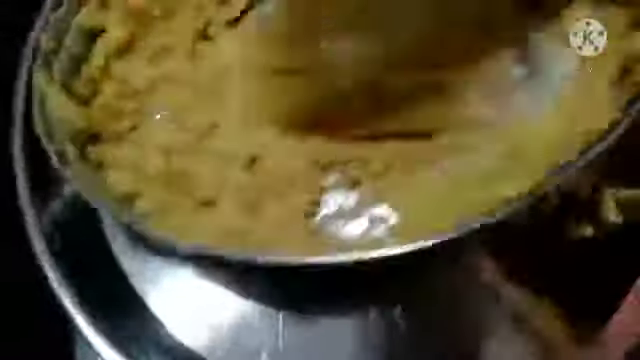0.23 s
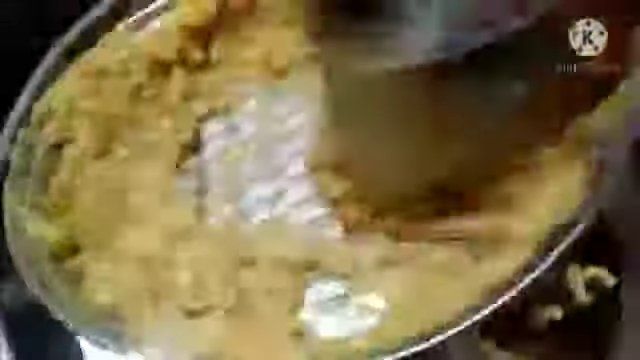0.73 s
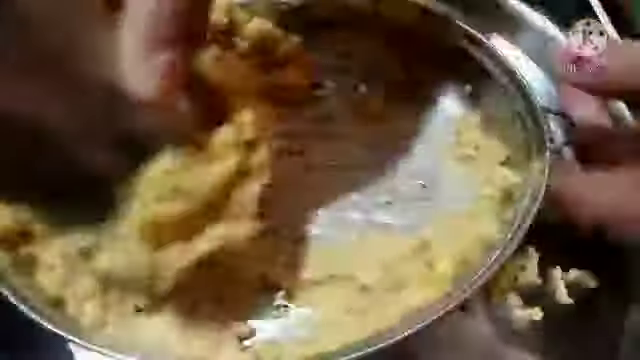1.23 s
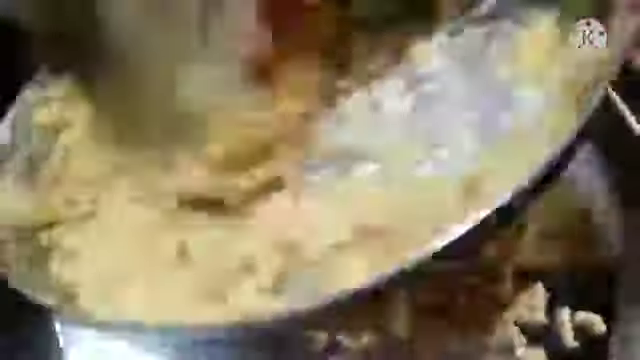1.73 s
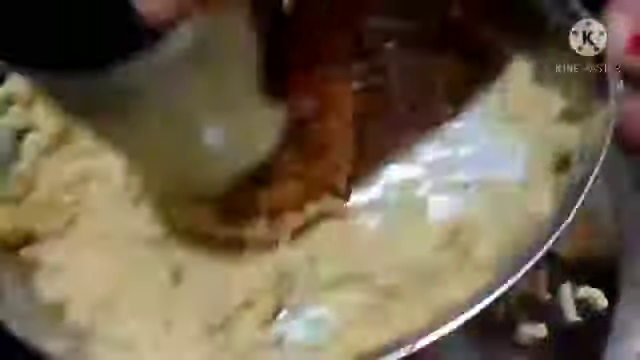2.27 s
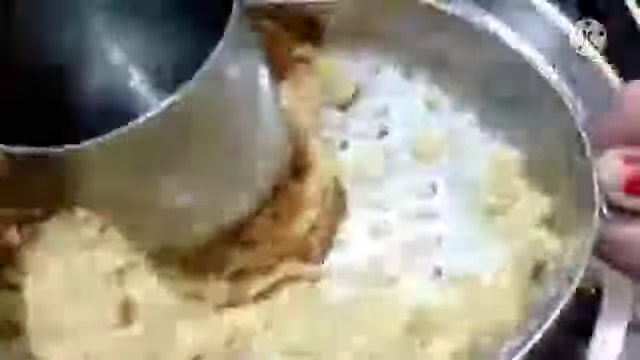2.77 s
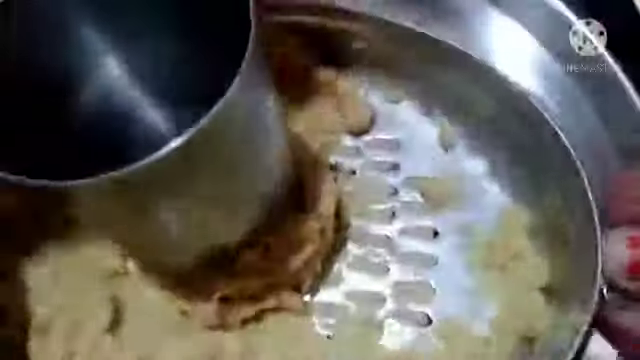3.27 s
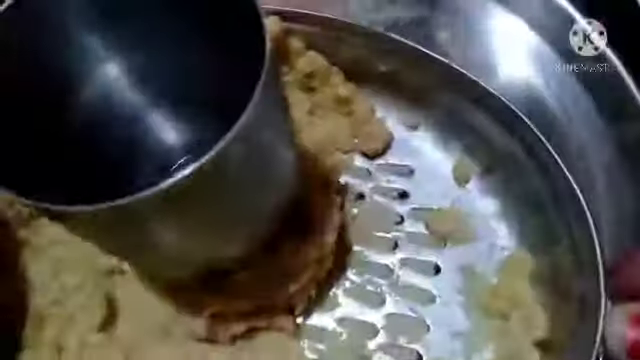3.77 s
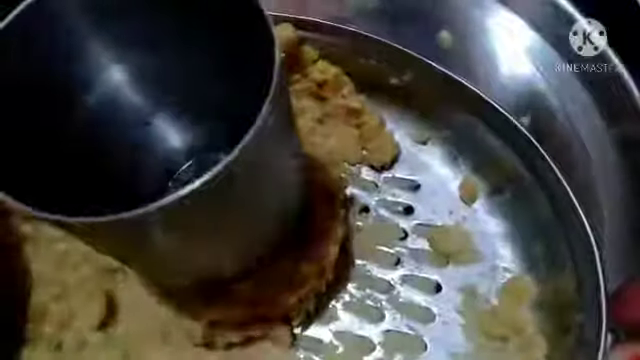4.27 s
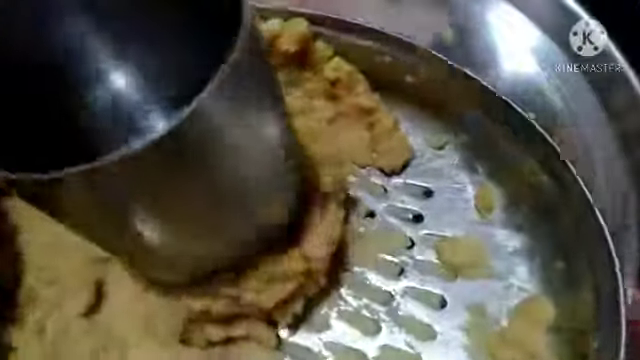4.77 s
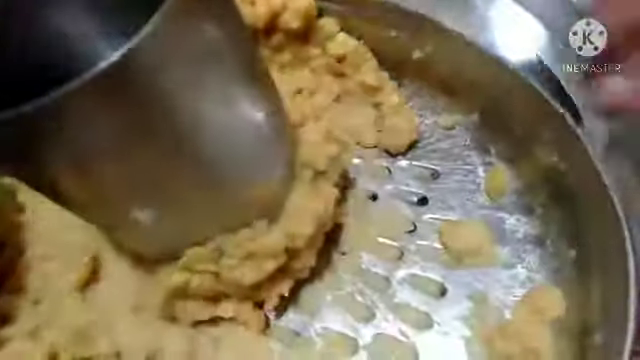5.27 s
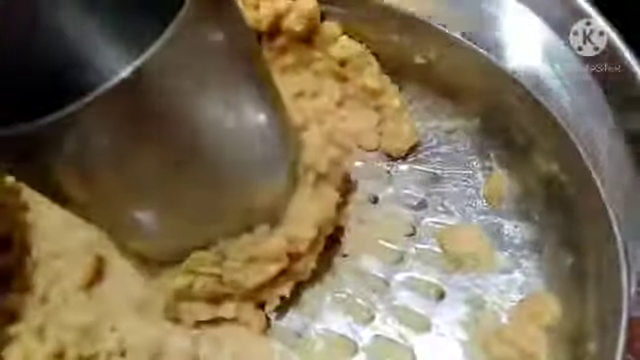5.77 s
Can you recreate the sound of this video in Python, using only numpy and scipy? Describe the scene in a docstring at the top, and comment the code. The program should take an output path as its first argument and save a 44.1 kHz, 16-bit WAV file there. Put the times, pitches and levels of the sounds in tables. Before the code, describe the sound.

Gritty rubbing and soft wet pops on perforated steel, scattered clanks, a hard cluster of steel knocks, then near quiet over faint hum.

```python
"""Rubbing lentils through a steel sieve

Cooked lentils are rubbed through a perforated steel sieve with the base of a steel tumbler in a small hard kitchen.
Under each stroke dense clicks hiss, and wet pops squelch through a resonance that glides in pitch.
Steel knocks are short noise cracks that set damped modes ringing into a noise-tail room; low smacks and dry ticks
are brief pitched bursts. Low thumps swing back slowly under the heaviest knocks, and the room tone and motor hum
behind, coloured noise and wavering sines, dip for a moment after each."""
import sys
import numpy as np
from scipy import signal
from scipy.fft import rfft, irfft
from scipy.io import wavfile

SR = 44100
rng = np.random.default_rng(int(sys.argv[2]) if len(sys.argv) > 2 else 0)


def unload_audio(sound):
    """Save the sound as a 16-bit wav file, at the path given as the first command line argument."""
    columns = np.transpose(np.atleast_2d(sound))
    # keep every value between -1 and 1, then stretch to whole-number steps
    steps = np.round(np.clip(columns, -1, 1) * 32767)
    wavfile.write(sys.argv[1], SR, steps.astype(np.int16))


def invert_db(x):
    """Field ratio 10**(x/20) for x, a level in decibels (scalar or array-like)."""
    u = np.asarray(x, float) / 20
    return 10 ** u


N = 265041  # samples

# strokes of the tumbler: (hardest moment [s], lead-in [s], friction hiss [dB], squelch [dB],
# way [1 push, -1 pull, less for a short slide])
RUB_STROKES = [(0.019, 0.067, -46, -52.5, -0.7), (0.159, 0.056, -46.5, -50.5, -1.15),
               (0.286, 0.059, -46.5, -50.5, -0.95), (0.435, 0.069, -47.5, -50.5, 0.71),
               (0.576, 0.071, -41, -46, -1.1), (0.737, 0.077, -41, -45.5, 0.4),
               (0.828, 0.022, -41, -47, -1.16), (1.42, 0.23, -58, -62.5, -0.36),
               (1.57, 0.095, -48.5, -51, 0.18), (1.806, 0.19, -58, -62.5, -1.03),
               (1.862, 0.07, -50, -48.5, 0.81), (2.013, 0.13, -52, -63, -0.33),
               (2.098, .035, -50, -45, 0.58), (2.209, 0.05, -52.5, -63, -0.79),
               (2.27, 0.021, -62.5, -72, 0.13), (2.381, 0.071, -59, -62.5, 1),
               (5.385, 0.14, -48, -61.5, 0.1), (5.451, 0.06, -43, -59, 0.33), (5.529, .02, -50.5, -69, -2),
               (5.984, 0.07, -57.5, -72, 0.68)]
# knocks that set the steel ringing: (time [s], crack peak [dB], favoured ring [Hz],
# brightness control [dB before scaling], ringing drive [dB re crack])
STEEL_KNOCKS = [(.461, -28.5, 4540, 8, -8.8), (.872, -11.5, 6500, 28, -7.5), (.883, -17.5, 5760, -20, -28),
                (1.513, -38, 4520, 20, -6), (1.578, -18.5, 3260, -8, -10.5), (1.642, -24, 2280, -2, -6.5),
                (2.023, -17, 2400, 22, -6.5), (2.298, -18, 3170, 15, -12), (3.013, -28.5, 6500, 19, -1),
                (3.018, -32, 3840, 25, -9.5), (3.077, -39, 3650, 8, -10), (3.292, -27.5, 2700, -52, -8),
                (3.308, -30, 5360, -37, -1), (3.781, -9, 5900, -4.5, 0.5), (3.941, -10.5, 6040, 16.5, -2.5),
                (4.097, -7.5, 5800, 12, -4), (4.114, -17, 6300, -2.5, 5.5), (4.146, -19, 6150, 1, -4),
                (4.265, -15.5, 7440, 9, 3), (4.421, -9.5, 6230, 12, -0.5), (4.821, -52, 3190, 3, -7),
                (5.458, -35, 3210, 42, -3.5), (5.545, -36, 3570, 16, -14.5), (6.004, -21.5, 6180, -21, -35)]
# low thumps: the recorder's high-pass makes the heaviest knocks swing back slowly:
# (time [s], height [factor on the swing], background dip [dB])
LOW_THUMPS = [(.873, .07, -8), (3.782, .07, -4), (3.942, .003, -6), (4.098, -.012, -6), (4.421, .052, -6)]
# modes of sieve, tumbler and pot below: (frequency [Hz], relative strength [dB], t60 [s])
STEEL_MODES = [(270, -10, .2), (330, -14, .2), (470, -10, .08), (985, -9, .18), (1140, -14, .1),
               (2090, 3, .08), (2509, 3, .055), (2960, -8, .12), (3391, -9, .1), (3480, -3, .11),
               (3690, -7, .12), (3811, -3, .16), (3980, -4, .14), (4180, -4, .14), (4893, -7, .12),
               (5390, -8, .12), (5570, -7, .12), (5981, -8, .1), (6320, -7, .12), (6500, -6, .15),
               (6850, -7, .12), (7084, -6, .12), (7644, -10, .12), (8904, -12, .1), (10350, -12, .1),
               (11750, -12, .1), (13100, -10, .1)]
# friction spectrum: (frequency [Hz], relative level [dB per Hz])
HISS_SPECTRUM = [(1180, -41), (2000, -31), (2160, -15), (2550, -25), (2780, -12), (4750, -6), (6210, 2.5),
                 (11100, -8.5), (12200, -7), (13200, -5.5), (15800, 1)]
# crack spectrum of a knock, before its own tilt and focus: (frequency [Hz], relative level [dB per Hz])
CRACK_SPECTRUM = [(53, -22.5), (90, -7.5), (337, -10.5), (466, -3.5), (672, 1.5), (930, 7.5), (1740, -8.5),
                  (3120, -6.5), (3790, -15.5), (6240, -2), (8440, -14), (12700, -12), (14800, -6.5),
                  (15800, -5.5)]
# decay of the kitchen: (frequency [Hz], t60 [s])
ROOM_DECAY = [(200, 0.93), (1400, 0.48), (3700, 0.6), (9700, 0.41), (15000, 0.37)]
# room tone spectrum: (frequency [Hz], relative level [dB per Hz])
ROOM_TONE = [(50, -31), (85, -6.5), (115, -10.5), (147, -21), (222, -9.5), (678, -23.5), (844, -20.5),
             (1810, -23.5), (2020, -25.5), (2570, -28), (4640, -32.5), (6450, -30), (12700, -37),
             (14800, -28), (15800, -42.5)]
# motor lines: (frequency [Hz], level [dB])
MOTOR_LINES = [(48.4, -59), (96.9, -66), (193.8, -77), (344.5, -79), (586.8, -84.5), (1297, -84),
               (1960, -93.5), (2056, -79.5)]
# dry ticks of grit on steel: (time [s], peak [dB], pitch [Hz])
GRIT_TICKS = [(.572, -26, 6350), (.857, -22, 6300), (1.339, -34, 6300), (1.372, -18, 6270),
              (1.421, -26, 6540), (1.478, -45.5, 3500), (1.546, -40, 5030), (1.822, -39, 6000),
              (2.203, -35.5, 6300), (2.252, -40, 6960), (2.396, -37.5, 6800), (2.428, -47, 6700),
              (3.642, -50, 8440), (4.877, -49.5, 6460), (5.065, -50.5, 6480), (5.259, -49.5, 6240),
              (5.38, -52, 6500), (5.505, -36.5, 6900), (5.545, -27.5, 7700), (5.688, -50.5, 6800)]
# low smacks, wet paste under the strokes and dull thuds under the knocks: (time [s], peak [dB], pitch [Hz])
LOW_SMACKS = [(.025, -43, 714), (.04, -35.5, 1450), (.138, -35, 1260), (.462, -32, 1420), (.558, -32, 1780),
              (.571, -27, 1200), (.745, -32, 1300), (.836, -29.5, 1260), (1.277, -45.5, 1060),
              (1.343, -48.5, 644), (1.372, -39.5, 1380), (1.589, -26.5, 1490), (1.979, -38, 575),
              (1.995, -32.5, 1480), (2.11, -35, 600), (2.128, -34.5, 810), (3.293, -31, 457),
              (3.773, -23, 550), (4.116, -29.5, 480), (4.267, -26, 459), (5.259, -47.5, 664),
              (5.37, -49, 1250), (5.49, -47.5, 1350), (5.55, -49, 1260)]

LET_GO_S, PRESSURE_POWER = 0.099, 2.4
RUMBLE_HZ, RUMBLE_DB = [55, 317], -11  # band; level re the unit squelch
# the air pocket under the paste shrinks on a push (pitch climbs) and widens on a pull
POCKET_HZ, POCKET_OCTAVES, GLIDE_S, PUSH_LATE_S, PULL_LATE_S = 982, 1, 0.018, 0.0086, 0.014
SMACK_OCTAVES, SMACK_S, SMACK_CYCLES = 0.31, 0.0013, 3.15  # width; fade = time + cycles of its pitch
TICK_OCTAVES, TICK_S, TICK_TOP_HZ, TICK_TOP_DB = 0.39, 0.0017, 13500, -11.5  # width, fade, upper ring
BODY_DB, TREBLE_DB = -27, -7.5  # low and high end of a neutral crack's tilt, before scaling
PITCHED_BELOW_HZ = 5000  # knocks favouring a lower ring are duller and more pitched
PITCHED_RING_DB, BRIGHT_RING_DB = -5.5, -17.5  # how hard each kind drives the modes
FOCUS_OCTAVES, NEAR_DB_PER_OCTAVE = 1, -45.5  # reach of the crack's peak; fall of modes away from the ring
PITCHED_FAR_DB, BRIGHT_FAR_DB = -21, -13  # floor of that fall
SMOOTH_SHARE = 0.45  # share of the smooth pulse in what a knock sends into the room
DIP_FALL_S, DIP_HOLD_S, DIP_RETURN_S = 0.04, 0.2, 0.28
ROOM_TONE_DB = -65.5


def rubbing():
    """Dense grit hisses; wet paste pops into the moving air pocket and the shallow dish of the sieve."""
    t, hiss_gain, squelch_gain = np.arange(N) / SR, np.zeros(N), np.zeros(N)
    for hardest, lead_s, hiss_db, squelch_db, way in RUB_STROKES:
        ramp = np.interp(t, [hardest - lead_s, hardest, hardest + LET_GO_S], [0, 1, 0])
        pressure = np.sin(np.pi / 2 * ramp) ** PRESSURE_POWER
        hiss_gain += invert_db(hiss_db) * pressure
        squelch_gain += invert_db(squelch_db) * pressure
    hiss = colour(grains(8000, spread_db=2.5), HISS_SPECTRUM) * invert_db(3.2 * drift(56))
    pops = grains(3000, spread_db=3.2) * invert_db(3.8 * drift(60))
    dish = rms_one(band_pass(pops, [1000, 2500]))
    gliding = rms_one(pocket(pops, pocket_pitch(t), sharpness=5.0))
    # the sieve shudders on the pot under each stroke
    rumble = rms_one(band_pass(pops, RUMBLE_HZ))
    squelch = rms_one(gliding + 0.9 * dish) + invert_db(RUMBLE_DB) * rumble
    return hiss * hiss_gain + squelch * squelch_gain


def pocket_pitch(t):
    """Pitch of the air pocket: the nearest stroke sweeps it up or down."""
    hardest, way = np.array(RUB_STROKES)[:, 0], np.array(RUB_STROKES)[:, 4]
    nearest = np.searchsorted((hardest[1:] + hardest[:-1]) / 2, t)
    late = np.where(way[nearest] > 0, PUSH_LATE_S, PULL_LATE_S)
    since = t - hardest[nearest] - late
    return POCKET_HZ * 2 ** (POCKET_OCTAVES * way[nearest] * np.tanh(since / GLIDE_S))


def pocket(x, hz, sharpness):
    """An air resonance whose centre moves, stepped in short blocks."""
    out, state, size = np.zeros(N), np.zeros(2), 128
    for i in range(0, N, size):
        r = np.exp(-np.pi * hz[i] / sharpness / SR)
        zeros = [np.sqrt(1 - r), 0, -np.sqrt(1 - r)]
        poles = [1, -2 * r * np.cos(2 * np.pi * hz[i] / SR), r * r]
        out[i:i + size], state = signal.lfilter(zeros, poles, x[i:i + size], zi=state)
    return out


def knocks():
    """A short crack drives the modes nearest its favoured ring; returns close sound and room send."""
    cracks, loose, size = np.zeros(N + SR), np.zeros(N + SR), 2000
    modes, hz = np.array(STEEL_MODES), np.arange(size // 2 + 1) * SR / size
    mode_hz, mode_db = modes[:, 0], modes[:, 1]
    excite = np.zeros((len(modes), N + SR))
    noise = rng.standard_normal((len(STEEL_KNOCKS), size))
    luck_db = rng.normal(0, 2, (len(STEEL_KNOCKS), len(modes)))
    for k, (s, peak_db, ring_hz, bright_db, ringing_db) in enumerate(STEEL_KNOCKS):
        i = round(s * SR)
        if ring_hz < PITCHED_BELOW_HZ:
            focus_db, drive_db, far_db = 10.5, PITCHED_RING_DB, PITCHED_FAR_DB
        else:
            focus_db, drive_db, far_db = 2.5, BRIGHT_RING_DB, BRIGHT_FAR_DB
        tilt = [(1200, BODY_DB - bright_db / 2), (2200, 0.0053), (7500, 0), (10000, TREBLE_DB + bright_db / 2)]
        reach = 2 ** FOCUS_OCTAVES
        focus = [(ring_hz / reach, 0), (ring_hz, focus_db), (ring_hz * reach, 0)]
        tone_db = at_hz(CRACK_SPECTRUM, hz) + 0.32 * at_hz(tilt, hz) + at_hz(focus, hz)
        crack = burst(noise[k], tone_db, 0.00047, 0.0042)
        # same colour as the crack, in one smooth pulse
        pulse = np.roll(irfft(invert_db(tone_db), size), size // 20)
        blow = rms_one(pulse) * np.std(crack)
        cracks[i:i + size] += invert_db(peak_db) * crack
        mixed = SMOOTH_SHARE * blow + (1 - SMOOTH_SHARE) * crack
        loose[i:i + size] += invert_db(peak_db + ringing_db) * mixed
        away_db = np.maximum(NEAR_DB_PER_OCTAVE * np.abs(np.log2(mode_hz / ring_hz)), far_db)
        near_db = away_db * (mode_hz > 1500) + 0.5 * at_hz(tilt, mode_hz)
        excite[:, i] += invert_db(peak_db + ringing_db + drive_db + mode_db + near_db + luck_db[k])
    rings = np.zeros(N)
    for k, (hz, db, t60) in enumerate(STEEL_MODES):
        for twin in (1, 1.008):  # round vessels ring in close pairs that beat
            rings += ring(excite[k, :N], hz * twin, t60)
    return cracks[:N] + rings, loose[:N] + invert_db(-8) * rings


def ring(clicks, hz, t60):
    """A damped steel mode: a unit click sets a sine of starting height 1 ringing."""
    r, w = invert_db(-60 / (t60 * SR)), 2 * np.pi * hz / SR
    return signal.lfilter([0, np.sin(w)], [1, -2 * r * np.cos(w), r * r], clicks + 1e-18)


def smacks_and_ticks():
    """Low smacks and dry ticks, each a brief, heavily damped burst."""
    smacks = bursts(LOW_SMACKS, SMACK_OCTAVES, SMACK_S, SMACK_CYCLES, -np.inf)
    return smacks + bursts(GRIT_TICKS, TICK_OCTAVES, TICK_S, 0, TICK_TOP_DB)


def bursts(rows, octaves, fade_s, cycles, top_db):
    """Each row is a brief burst around one pitch, with a share of the upper ring."""
    out, size = np.zeros(N + SR), 2000
    hz = np.arange(size // 2 + 1) * SR / size + 1
    noise = rng.standard_normal((len(rows), size))
    top = top_db - 12 * (np.log2(hz / TICK_TOP_HZ) / octaves) ** 2
    for k, (s, peak_db, centre_hz) in enumerate(rows):
        i = round(s * SR)
        peak = -12 * (np.log2(hz / centre_hz) / octaves) ** 2
        tone_db = np.maximum(np.maximum(peak, top), -26)
        fade = fade_s + cycles / centre_hz
        out[i:i + size] += invert_db(peak_db) * burst(noise[k], tone_db, fade / 3, fade)
    return out[:N]


def burst(noise, tone_db, rise_s, fade_s):
    """A short coloured noise burst of peak 1, with exponential rise and fade."""
    t = np.arange(len(noise)) / SR
    envelope = (1 - np.exp(-t / rise_s)) * np.exp(-t / fade_s)
    crack = irfft(rfft(noise) * invert_db(tone_db), len(t)) * envelope
    return crack / np.abs(crack).max()


def low_thumps():
    """The high-passed heaviest knocks swing back slowly through zero; the next thump cuts the swing short."""
    out, t = np.zeros(N + SR), np.arange(SR // 2) / SR
    swing = 0.5 * np.exp(-t / 0.002) + 3.3 * np.exp(-t / 0.05) - 2.3 * np.exp(-t / 0.085)
    swing *= (1 - np.exp(-t / 0.0005)) * np.exp(-(t / 0.26) ** 2)
    for s, height, dip_db in LOW_THUMPS:
        i = round(s * SR)
        out[i:i + len(t)] = height * swing + out[i] * np.exp(-t / 0.006)
    return out[:N]


def kitchen(x):
    """Dense reflections: octave bands of noise, each dying at its own rate."""
    t, tail = np.arange(SR) / SR, np.zeros(SR)
    for low in 150 * 2.0 ** np.arange(7):
        band = band_pass(rng.standard_normal(SR), [low, min(2 * low, 17000)])
        tail += band * invert_db(-60 * t / at_hz(ROOM_DECAY, np.sqrt(2) * low))
    tail *= np.minimum(t / 0.0086, 1)  # reflections build up
    return signal.fftconvolve(x, tail / np.sqrt(np.sum(tail ** 2)))[:N]


def background():
    """Room tone as coloured noise and the slightly wavering lines of a motor, dipping together."""
    t = np.arange(N) / SR
    wander = np.cumsum(drift(1.3)) / SR * 0.0023
    lines = np.zeros(N)
    for hz, db in MOTOR_LINES:
        level = invert_db(db + 0.37 * drift(7.5)) * np.sqrt(2)
        lines += level * np.sin(2 * np.pi * hz * (t + wander))
    room_tone = invert_db(ROOM_TONE_DB) * colour(rng.standard_normal(N), ROOM_TONE)
    return (lines + room_tone) * dips()


def dips():
    """After each low thump the level falls, holds and creeps back; the deepest dip counts."""
    t, each = np.arange(N) / SR, []
    for s, height, db in LOW_THUMPS:
        fall = 1 - np.exp(-np.maximum(t - s, 0) / DIP_FALL_S)
        creep_back = np.exp(-np.maximum(t - s - DIP_HOLD_S, 0) / DIP_RETURN_S)
        each.append(db * fall * creep_back)
    return invert_db(np.min(each, axis=0))


def at_hz(points, hz):
    """Reads a table on a log-frequency axis."""
    table = np.array(points)
    return np.interp(np.log(hz + 1), np.log(table[:, 0]), table[:, 1])


def rms_one(x):
    """Scales to unit power."""
    return x / np.sqrt(np.mean(x ** 2) + 1e-20)


def band_pass(x, edges_hz):
    """Keeps one band with gentle slopes."""
    return signal.sosfilt(signal.butter(2, edges_hz, "band", fs=SR, output="sos"), x)


def colour(x, spectrum):
    """Filters a noisy signal by a spectrum in dB per Hz, at unit power."""
    hz = np.arange(len(x) // 2 + 1) * SR / len(x)
    return rms_one(irfft(rfft(x) * invert_db(at_hz(spectrum, hz)), len(x)))


def drift(per_s):
    """Smooth random wander of unit power: noise through two equal low-pass poles at per_s Hz."""
    r = np.exp(-2 * np.pi * per_s / SR)
    smooth = signal.lfilter([1], [1, -2 * r, r * r], rng.standard_normal(N + SR))
    return rms_one(smooth[SR:])  # skip the settling


def grains(per_s, spread_db):
    """Random clicks of uneven size and either sign."""
    sizes = invert_db(spread_db * np.minimum(rng.exponential(1, N), 4)) * rng.choice([-1, 1], N)
    return sizes * (rng.random(N) < per_s / SR)


def scene():
    """Close sounds, their room tail, the low thumps and the background, in mono."""
    damped = rubbing() + smacks_and_ticks()
    hits, ringing = knocks()
    room = kitchen(invert_db(-13) * damped + ringing)
    return (damped + hits + room + low_thumps() + background())[None]


def band_limit(x):
    """A steep low-pass at the top of the band."""
    return signal.sosfilt(signal.butter(12, 16810, fs=SR, output="sos"), x)


def record(dry):
    """A steep low-pass cuts the top of the finished mix."""
    top_cut = signal.cheby2(10, 30, 15700, fs=SR, output="sos")  # order, stopband [dB], stopband edge [Hz]
    mix = signal.sosfilt(top_cut, dry)
    return band_limit(mix)


dry = scene()
out = record(dry)
unload_audio(out)
```